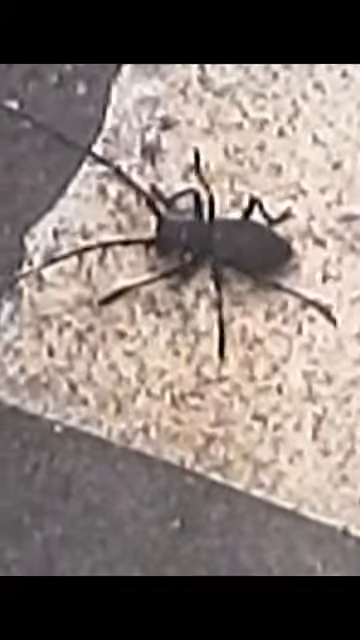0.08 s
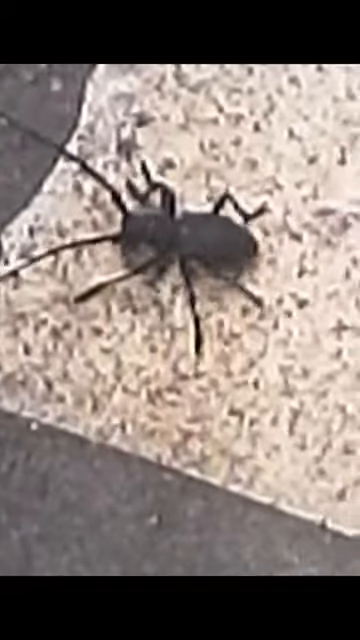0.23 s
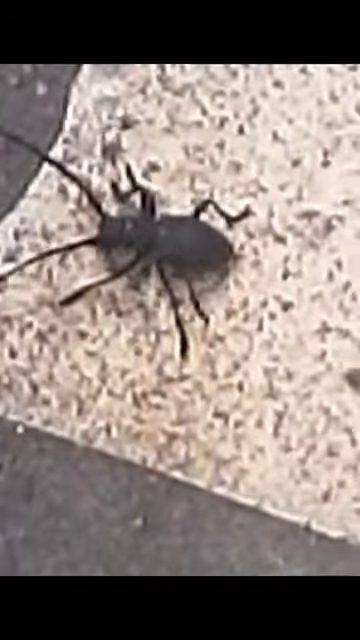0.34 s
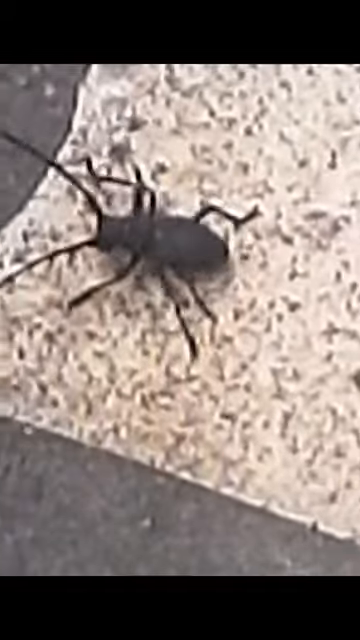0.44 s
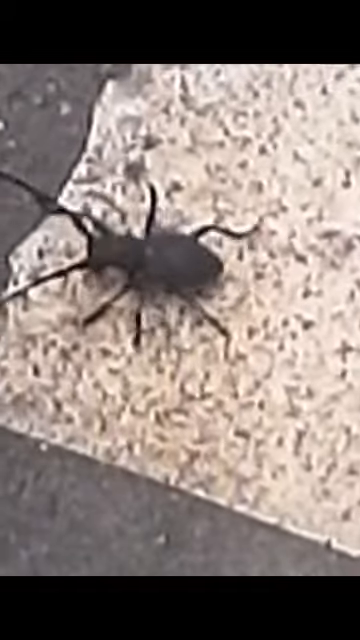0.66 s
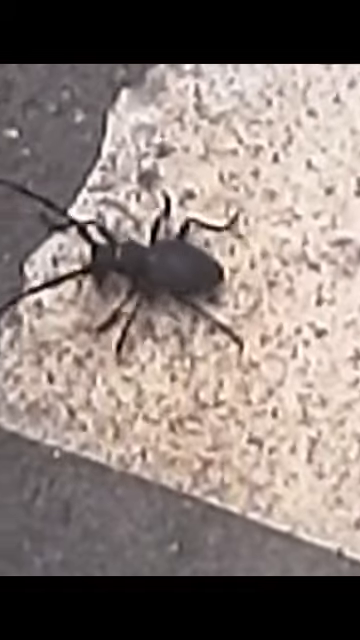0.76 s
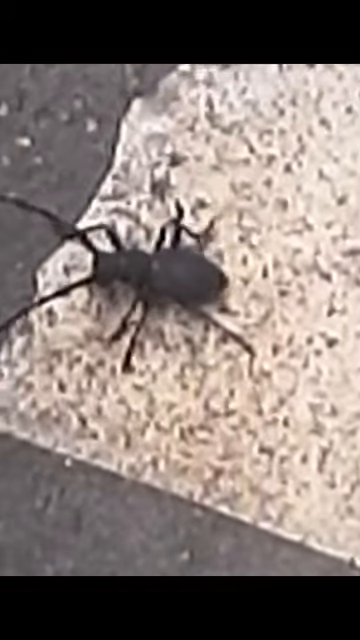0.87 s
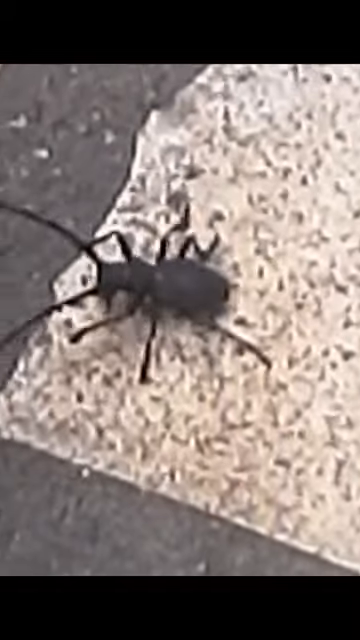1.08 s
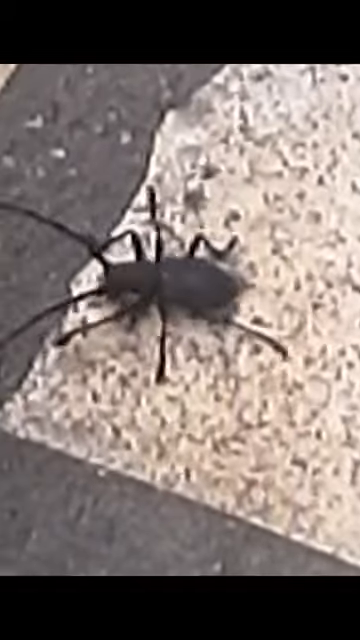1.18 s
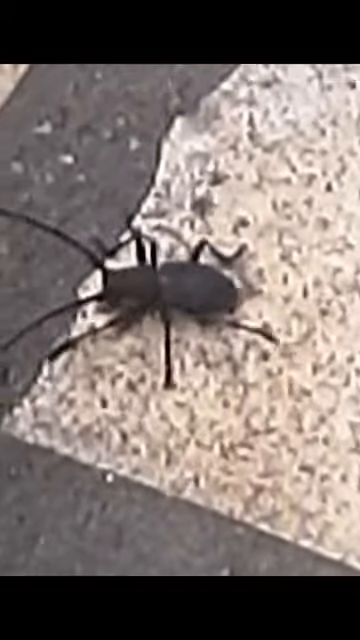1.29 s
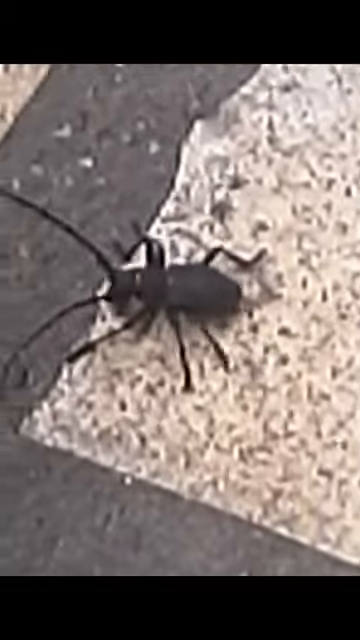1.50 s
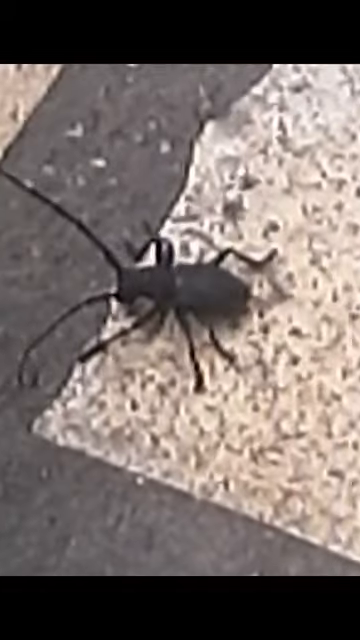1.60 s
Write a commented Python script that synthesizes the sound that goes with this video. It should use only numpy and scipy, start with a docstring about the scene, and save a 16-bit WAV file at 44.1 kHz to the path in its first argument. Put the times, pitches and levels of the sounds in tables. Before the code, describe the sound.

A small bird's single wheezy buzz in a paved outdoor yard. Faint distant chirps fall at 0.05-0.1 s; at 0.2 s a tiny tick and quick arched whistle lead into a high, rasping trill around 4-5.5 kHz, strongest from 0.45 s, fading and ending near 0.9 s with short echoes. Soft far chirps follow at 0.95, 1.15 and 1.4 s over low rumble and hiss, which dips slightly in quiet moments.

```python
"""Finch-like buzz in a paved yard

A small bird gives one wheezy buzz: a quick arched two-voice whistle with a tiny tick, then a tone swept
up and down about 150 times a second, ever wider. Delayed copies and fading noise tails are the echoes of
paving and walls. Faint falling chirps, gliding tones, come from farther off, over filtered-noise rumble
and hiss with brief low swells. A noise suppressor holds the sound down while the treble is quiet."""
import sys
import numpy as np
from scipy import signal
from scipy.fft import rfft, irfft
from scipy.io import wavfile
from scipy.ndimage import uniform_filter1d, map_coordinates

SR = 44100
rng = np.random.default_rng(int(sys.argv[2]) if len(sys.argv) > 2 else 0)


def transcribe(u):
    """Save the signal u as a 16-bit wav file named by the first command-line argument.

    u: samples, shape (n,) or (channels, n), limited to [-1, 1]; the rate is SR.
    q: integer samples, one column per channel.
    """
    v = np.clip(np.atleast_2d(u).T, -1, 1)
    q = np.round(v * 32767).astype(np.int16)
    wavfile.write(sys.argv[1], SR, q)


N = 72765
TIME = np.arange(N) / SR  # s
BIN_HZ = np.arange(N // 2 + 1) * SR / N  # frequency of each spectrum bin
OPPOSED = np.array([[1], [-1]])  # same signal, opposite polarity left and right


def undb(db):
    """Decibels to gain."""
    return 10 ** (np.asarray(db) / 20)


def curve(table, column=1):
    """One column of a table, joined by straight lines in time."""
    rows = np.array(table)
    return np.interp(TIME, rows[:, 0], rows[:, column])


def along(table):
    """A table over frequency, read at every spectrum bin along a logarithmic frequency scale."""
    rows = np.array(table)
    return np.interp(np.log(np.maximum(BIN_HZ, 1)), np.log(rows[:, 0]), rows[:, 1])


def during(table):
    """True between the first and the last time of a table."""
    return (TIME > table[0][0]) & (TIME < table[-1][0])


def unit(x):
    """Scale to rms 1."""
    return x / np.sqrt(np.mean(x ** 2))


def walk(rate_hz):
    """Smooth random wander of rms 1, heading for a new random value about rate_hz times a second."""
    hold = int(SR / rate_hz)
    steps = np.repeat(rng.standard_normal(N // hold + 1), hold)
    return unit(uniform_filter1d(steps, hold)[:N])


def band(x, lo_hz, hi_hz):
    """Band-pass filter."""
    return signal.sosfilt(signal.butter(2, [lo_hz, hi_hz], "band", fs=SR, output="sos"), x)


def bass_of(x):
    """The rumble range of a sound: a gentle low-pass that halves the amplitude at its corner."""
    corner_hz = 325
    return irfft(rfft(x) / (1 + (BIN_HZ / corner_hz) ** 2), N)


def tone(hz):
    """A sine of rms 1 that follows a pitch curve."""
    return np.sqrt(2) * np.sin(2 * np.pi * np.cumsum(hz) / SR)


def echoes(x, t60_s):
    """Dense reflections: a noise tail falling 60 dB in t60_s for each channel, wet as loud as dry."""
    tail = rng.standard_normal((2, N)) * np.exp(-np.log(1000) * TIME / t60_s)
    wet = signal.fftconvolve(x[None], tail, axes=1)[:, :N]
    return wet * np.std(x) / np.std(wet, axis=1, keepdims=True)


def background():
    """Outdoor rumble and wide hiss: noise with a set spectrum and stereo width, its bass fluttering."""
    # relative spectrum of the mid signal (frequency [Hz], density [dB per Hz])
    air_color = [(20, -4), (35, -10.5), (60, 0), (100, -3.5), (150, -7.5), (270, -18), (490, -20),
                 (700, -28.5), (1200, -29), (2100, -26.5), (3700, -20.5), (5200, -24), (7400, -32),
                 (9500, -29), (12300, -22.5), (15400, -26.5)]
    # correlation of left and right (frequency [Hz], likeness [-1..1])
    likeness = [(60, 0.72), (130, 0.86), (300, 0.46), (1400, 0.28), (3100, 0.23), (6800, -0.76),
                (15000, -0.5)]
    level_db, flutter_db, flutter_hz = -47, 1.3, 14.62
    mid, side = rfft(rng.standard_normal((2, N))) * undb(along(air_color))
    like = along(likeness)
    width = np.sqrt((1 - like) / (1 + like))  # side against mid that gives this correlation
    air = irfft(mid + OPPOSED * side * width, N)
    rumble = bass_of(air)
    hiss = air - rumble
    return undb(level_db) * unit(hiss + rumble * undb(flutter_db * walk(flutter_hz)))


def far_chirps():
    """Short warbling sine glides that fall, heard mostly through their echoes."""
    # distant notes (start [s], length [s], from [Hz], to [Hz], level at mid-note [dB])
    notes = [(0.048, 0.034, 4710, 3810, -51), (0.086, .035, 3620, 3080, -58.5),
             (0.241, 0.05, 3820, 3060, -48.5), (.945, .05, 4775, 4140, -53),
             (0.972, 0.061, 3540, 3470, -48.5), (1.163, 0.059, 4700, 4210, -54),
             (1.356, .035, 4500, 3930, -51), (1.388, 0.0338, 3650, 3170, -51)]
    direct_db, t60_s = -5.5, 0.25
    warble, warble_hz = 0.09, 500  # rms share of the pitch, rate
    dry_notes = 0
    for start, length, from_hz, to_hz, db in notes:
        progress = np.clip((TIME - start) / length, 0, 1)
        swell = np.sqrt(np.abs(np.sin(np.pi * progress)))
        glide_hz = from_hz + (to_hz - from_hz) * progress
        dry_notes = dry_notes + undb(db) * swell * tone(glide_hz * (1 + warble * walk(warble_hz)))
    return echoes(dry_notes, t60_s) + undb(direct_db) * dry_notes * OPPOSED


def whistle():
    """The arched note that opens the call: two gliding sines, one voice from each side of the syrinx."""
    # two voices (time [s], upper pitch [Hz], upper level [dB], lower pitch [Hz], lower level [dB])
    voices = [(.203, 4500, -62, 3900, -66), (.212, 5100, -43.5, 4000, -60), (.222, 5600, -45, 4750, -58),
              (.232, 5590, -44, 4350, -52), (.239, 5350, -46, 4230, -48), (.244, 5050, -41, 4230, -49),
              (.251, 4900, -58, 4250, -52)]
    upper_hz = curve(voices, 1) * (1 + 0.023 * walk(600))
    lower_hz = curve(voices, 3) * (1 + 0.0178 * walk(600))
    upper = tone(upper_hz) * undb(curve(voices, 2))
    lower = tone(lower_hz) * undb(curve(voices, 4))
    return (upper + lower) * during(voices)


def tick():
    """A tiny bright tick as the call begins: stereo band-passed noise, sudden, then dying away."""
    # the tick (start [s], decay time constant [s], level at onset [dB])
    start, decay, db = (.2095, 0.007, -49)
    age = TIME - start
    noise = unit(band(rng.standard_normal((2, N)), 4100, 11000))
    return undb(db) * noise * np.exp(-np.abs(age) / decay) * (age > 0)


def buzz():
    """One tone swept up and down again on every cycle of a fast trill, then filtered by the throat."""
    # loudness ahead of the throat (time [s], level [dB])
    loudness = [(.24, -51.5), (.275, -44.5), (.31, -42), (.345, -37.5), (.41, -37), (.455, -34),
                (.55, -34.5), (.63, -36), (.77, -35.5), (.85, -38.7), (.885, -41.5), (.9, -67)]
    # limits of each sweep (time [s], lowest [Hz], highest [Hz])
    span = [(.24, 4090, 4840), (.32, 4070, 4830), (.41, 3973, 5030), (.48, 3730, 5286), (.6, 3751, 5443),
            (.76, 3760, 5544), (.88, 3724, 5736)]
    # trill speed (time [s], rate [sweeps per s])
    sweep_rate = [(.29, 181), (.35, 165), (.5, 150), (.78, 147), (.89, 154)]
    # what throat and beak let through (frequency [Hz], gain [dB])
    throat = [(3350, -50), (3560, 1.5), (3780, 2.5), (4050, 2), (4330, 0.4), (4700, 0.1), (5100, -2.7),
              (5550, -3), (5800, 1.5), (6200, -54)]
    rate_jitter, pitch_jitter, flutter_db = 0.018, 0.011, 0.7  # rms: share of rate, share of pitch, dB
    rise_share = 0.433  # share of each cycle taken by the upstroke
    cusp = 1.08  # above 1 sharpens the peak of each sweep
    sweeps_per_s = curve(sweep_rate) * (1 + rate_jitter * walk(120))
    cycle = np.cumsum(sweeps_per_s) / SR % 1
    height = np.interp(cycle, [0, rise_share, 1], [0, 1, 0]) ** cusp
    low, high = curve(span, 1), curve(span, 2)
    hz = (low + (high - low) * height) * (1 + pitch_jitter * walk(400))
    db = curve(loudness) + flutter_db * walk(300)
    source = tone(hz) * undb(db) * during(loudness)
    return irfft(rfft(source) * undb(along(throat)), N)


def delayed(x, lag_s):
    """A sound arriving late, read between samples by cubic interpolation."""
    return map_coordinates(x, [(TIME - lag_s) * SR], order=3)


def yard(x):
    """Direct sound and two hard bounces at each microphone, then dense echoes of near and far walls."""
    # early reflections, relative to the direct sound (left lag [ms], left [dB], right lag [ms], right [dB])
    bounces = [(1.822, -4.5, .95, -13), (3.44, -12, 2.31, -10.3)]
    right_lag_s, pan_db = .000077, 1.1  # right later than left; left louder than right
    near_db, near_t60_s = -4.5, 0.096
    far_db, far_t60_s = -7.5, 0.73
    early = np.array([x, delayed(x, right_lag_s)])
    power = 1
    for left_ms, left_db, right_ms, right_db in bounces:
        gain = undb([[left_db], [right_db]])
        left = delayed(x, left_ms / 1000)
        right = delayed(x, right_lag_s + right_ms / 1000)
        early = early + gain * np.array([left, right])
        power = power + gain ** 2
    early = early / np.sqrt(power)  # bounces add colour without adding overall power
    walls = undb(near_db) * echoes(x, near_t60_s) + undb(far_db) * echoes(x, far_t60_s)
    return undb([[pan_db / 2], [-pan_db / 2]]) * (early + walls)


def low_swells():
    """Brief low swells under the call: band-passed noise with bell-shaped loudness, centred in stereo."""
    # swells (centre [s], half-width [s], pitch [Hz], peak level [dB])
    swells = [(.655, .02, 175, -51), (.72, .04, 185, -53), (.85, .03, 150, -56)]
    out = 0
    for at, length, hz, db in swells:
        bell = np.exp(-((TIME - at) / length) ** 2)
        noise = unit(band(rng.standard_normal(N), hz * .8, hz * 1.15))
        out = out + undb(db) * bell * noise
    return out


def scene():
    """The bird in its yard, a tick, far chirps, the background and its low swells."""
    return background() + far_chirps() + tick() + yard(whistle() + buzz()) + low_swells()


def record(dry):
    """A noise suppressor lowers the sound while the treble is quiet, the bass less; the top is cut."""
    treble_swing_db, bass_swing_db = -4.5, -0.5  # gain change from fully open to fully shut
    threshold_db, knee_db, sense_s = -47, 3, 0.0057
    top_hz = 15520
    power = uniform_filter1d(np.mean(band(dry, 2200, 5100) ** 2, axis=0), int(sense_s * SR))
    sensed_db = 10 * np.log10(np.abs(power) + 1e-12)
    # from -0.25 when loud (a slight lift) to 0.75 when quiet
    shut = (0.5 - np.tanh((sensed_db - threshold_db) / knee_db / 2)) / 2
    bass = bass_of(dry)
    treble = dry - bass
    out = bass * undb(bass_swing_db * shut) + treble * undb(treble_swing_db * shut)
    return irfft(rfft(out) * (BIN_HZ < top_hz), N)


dry = scene()
out = record(dry)
transcribe(out)
```